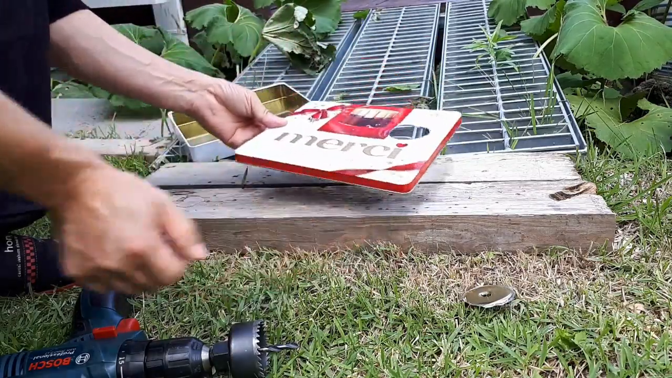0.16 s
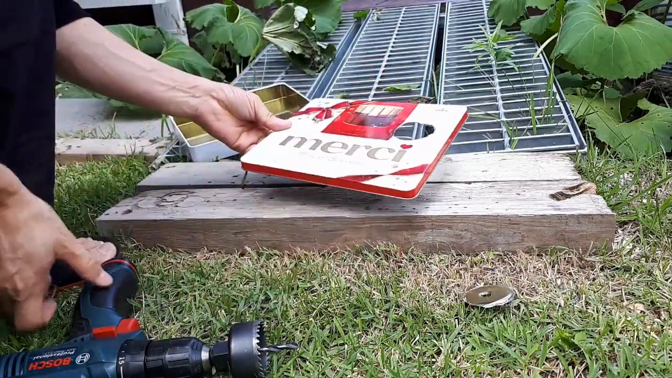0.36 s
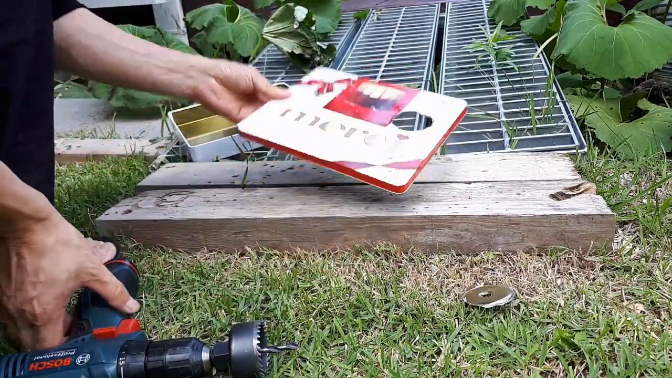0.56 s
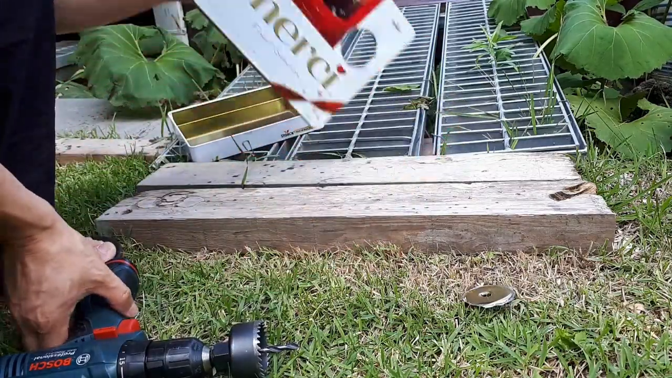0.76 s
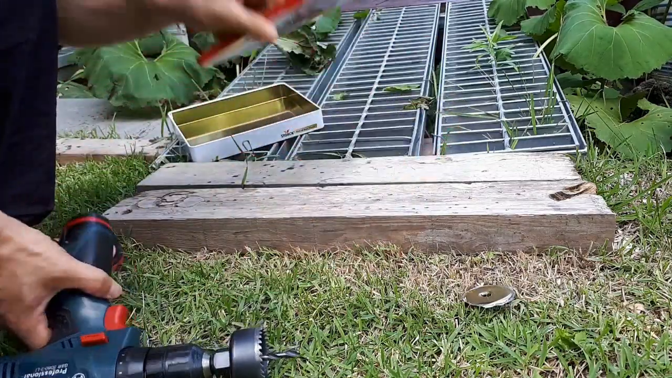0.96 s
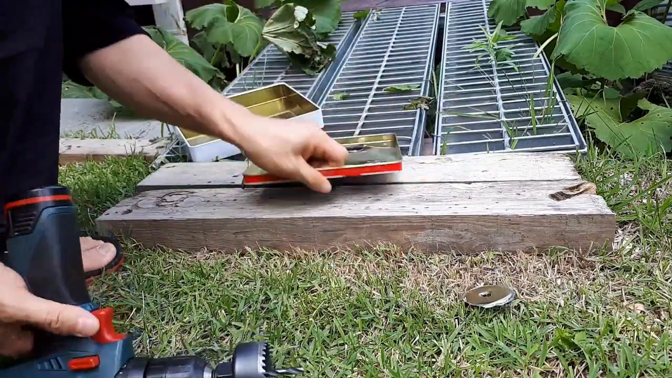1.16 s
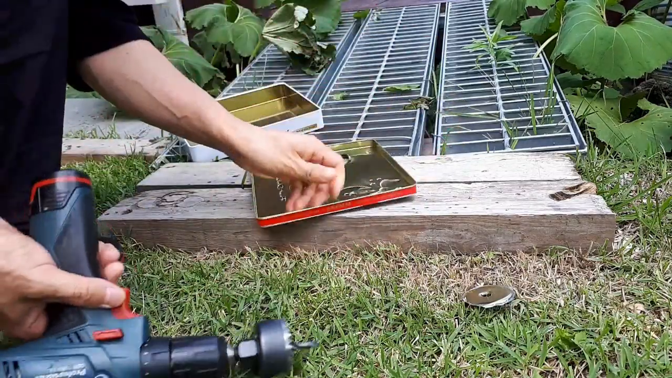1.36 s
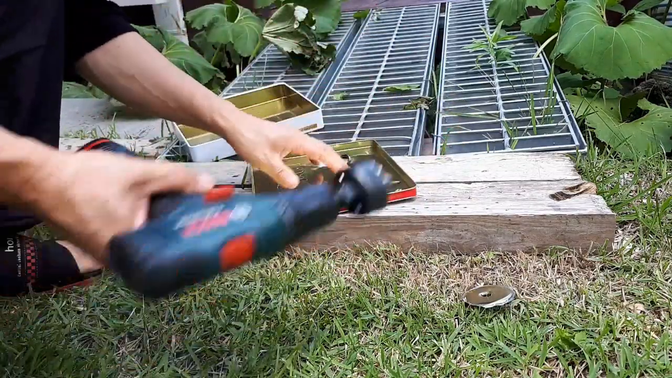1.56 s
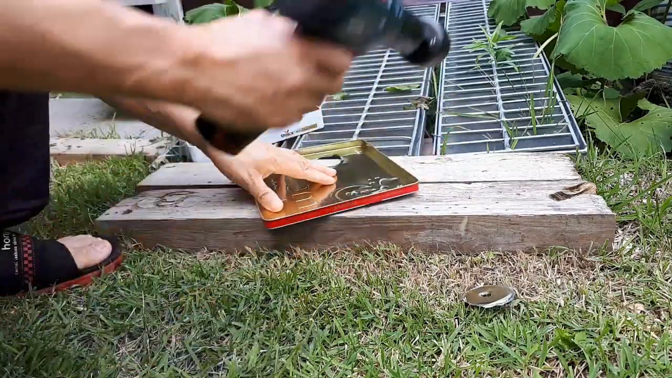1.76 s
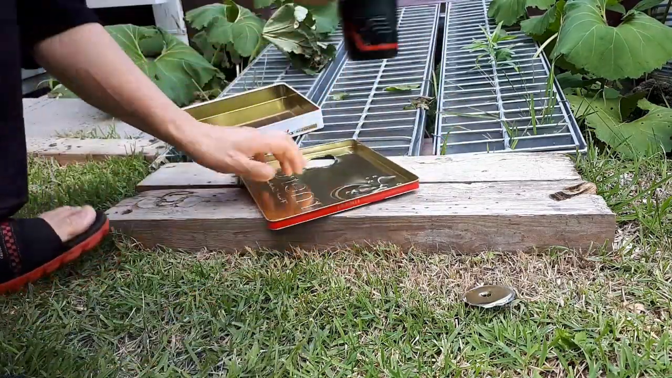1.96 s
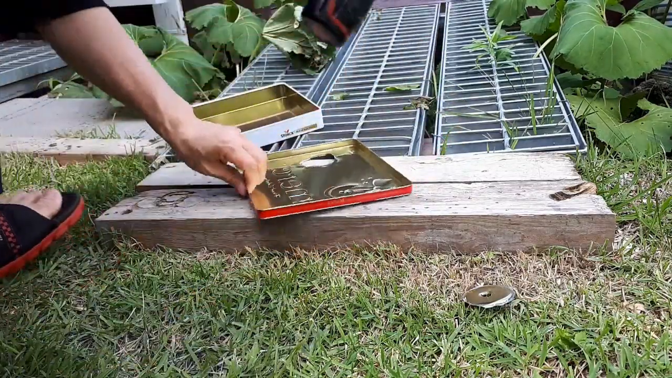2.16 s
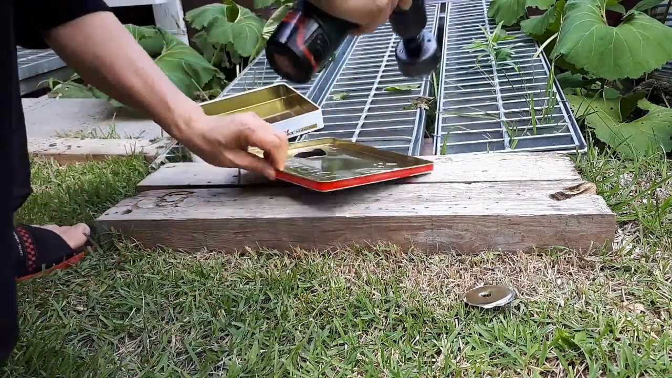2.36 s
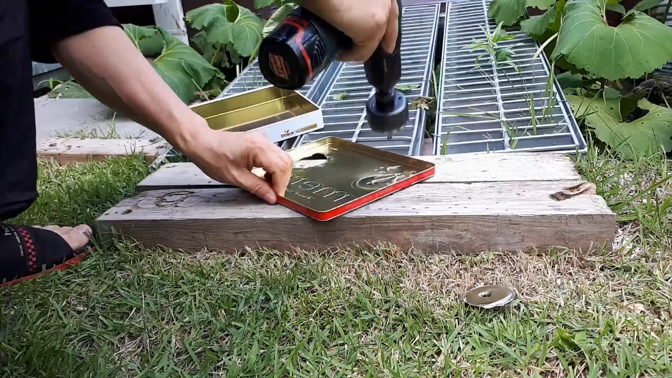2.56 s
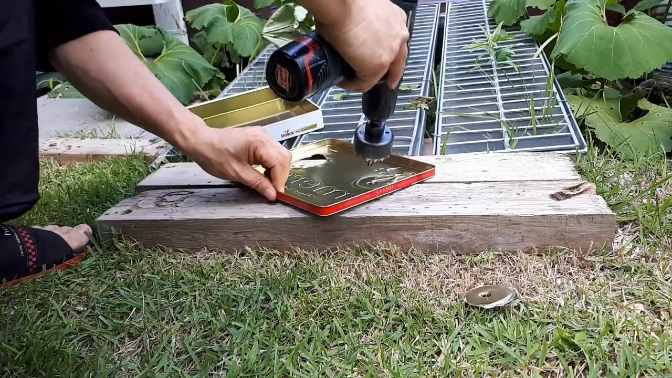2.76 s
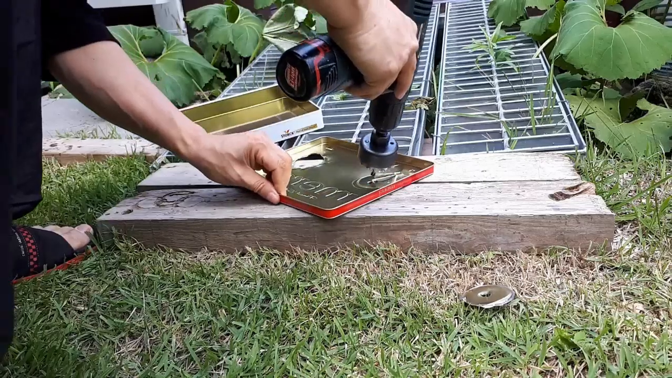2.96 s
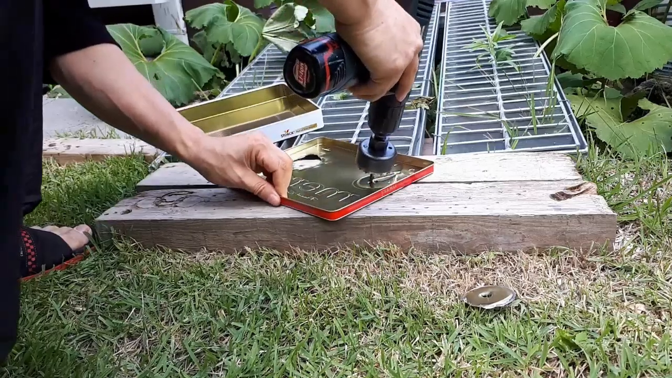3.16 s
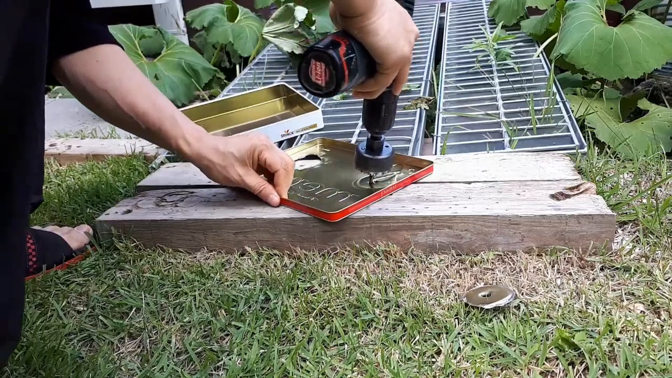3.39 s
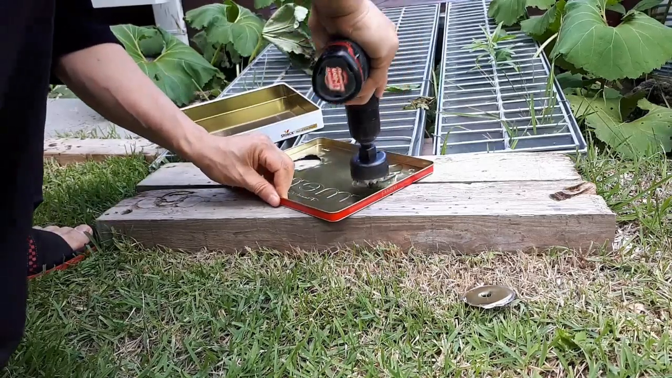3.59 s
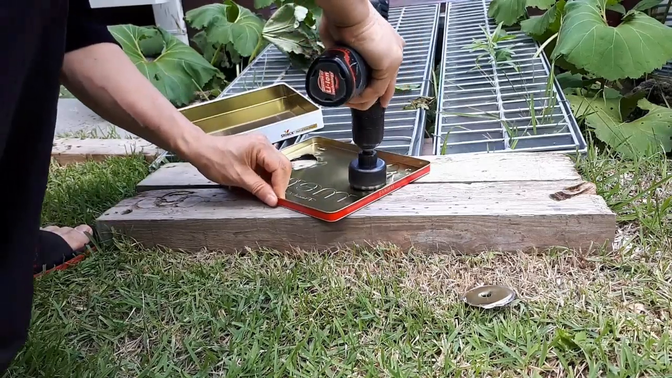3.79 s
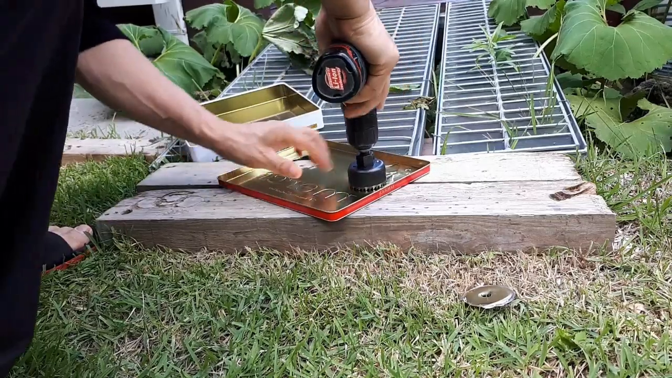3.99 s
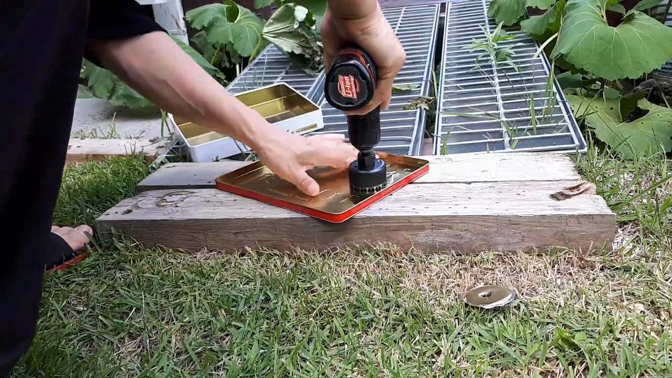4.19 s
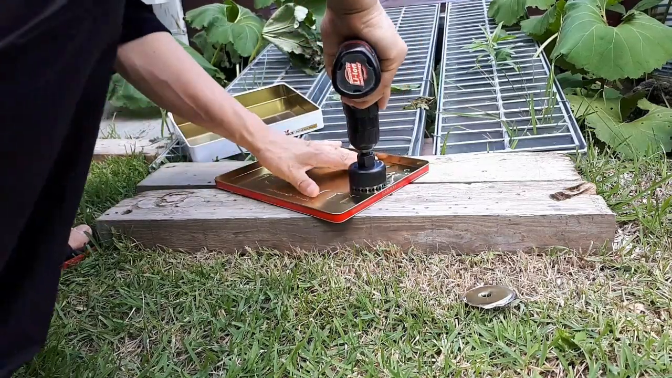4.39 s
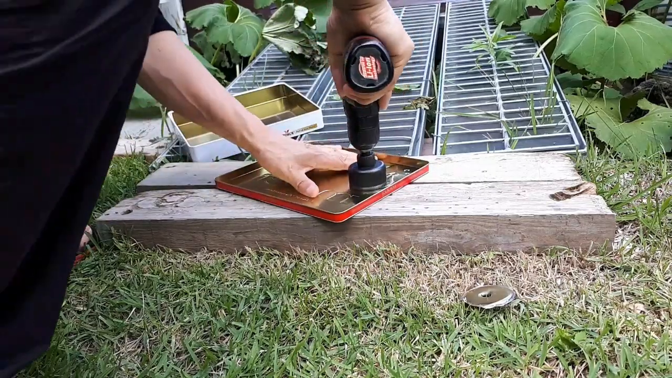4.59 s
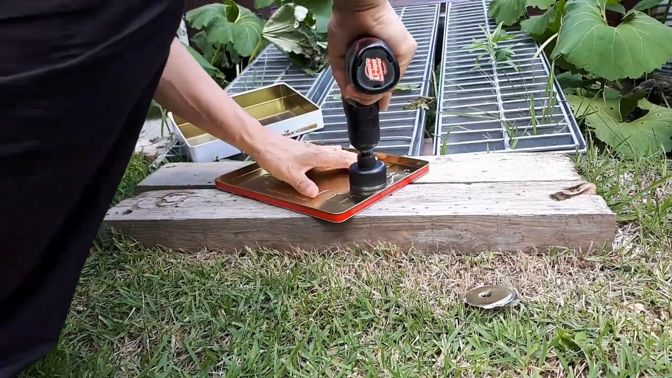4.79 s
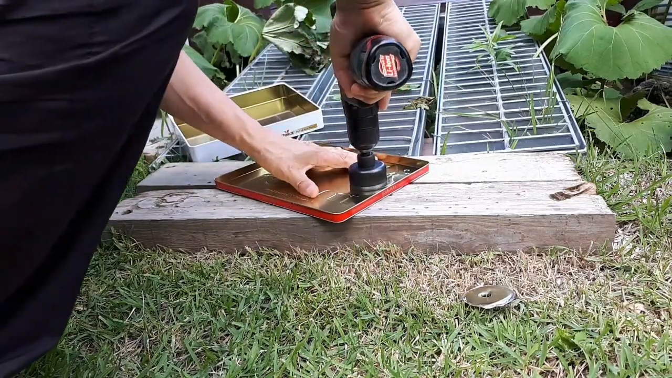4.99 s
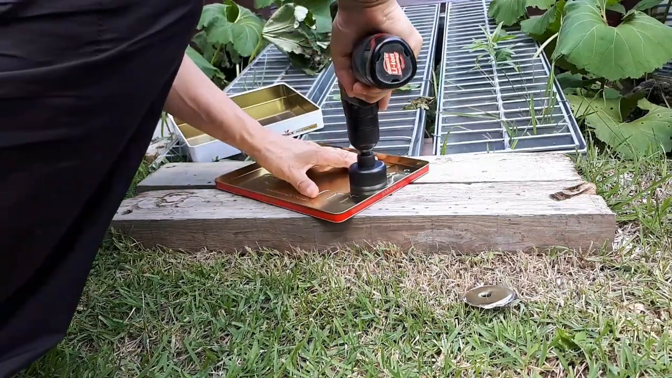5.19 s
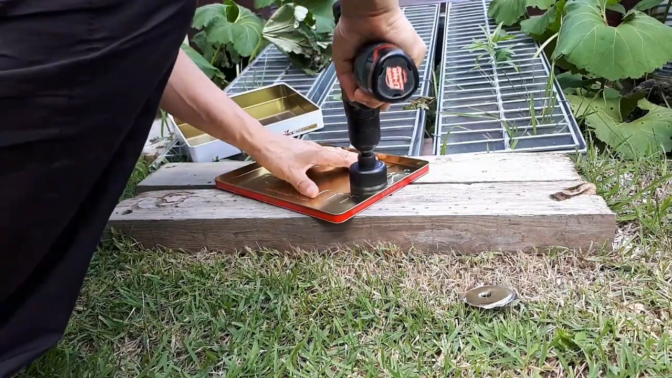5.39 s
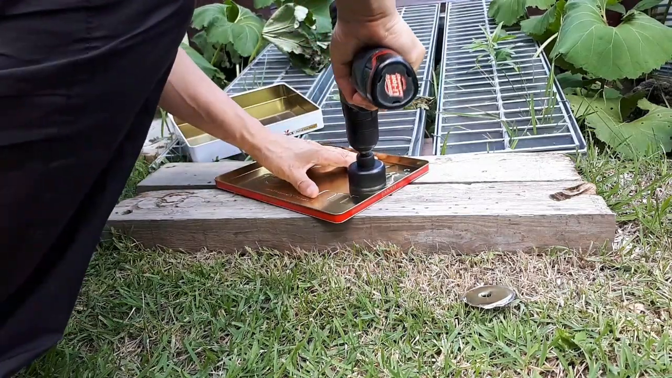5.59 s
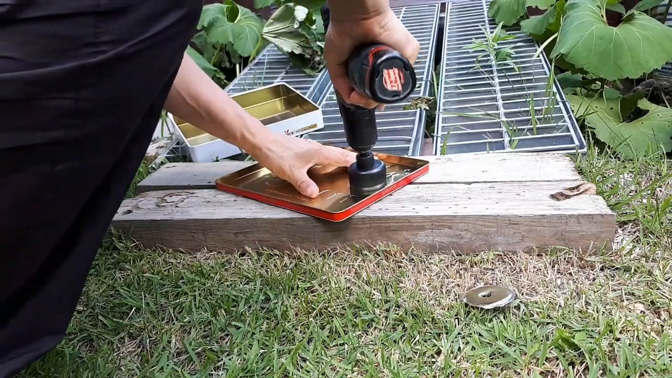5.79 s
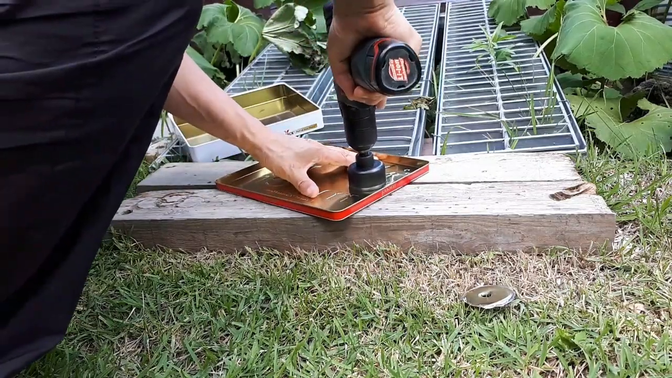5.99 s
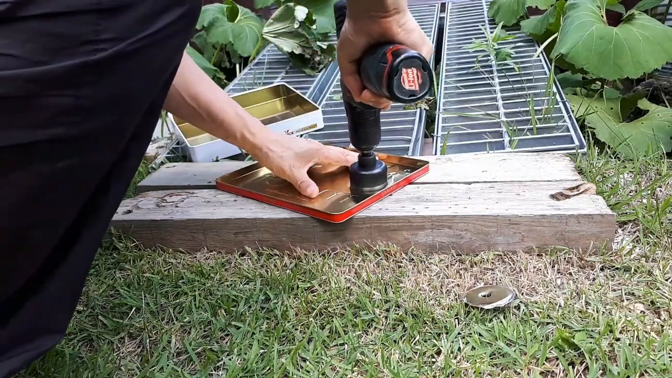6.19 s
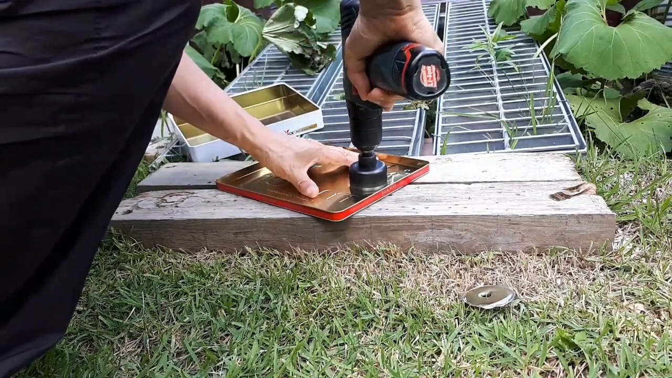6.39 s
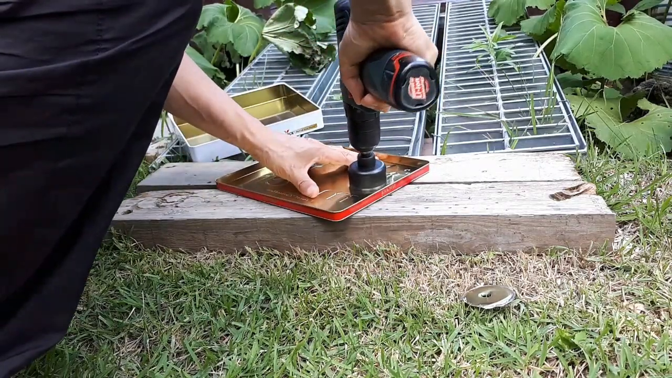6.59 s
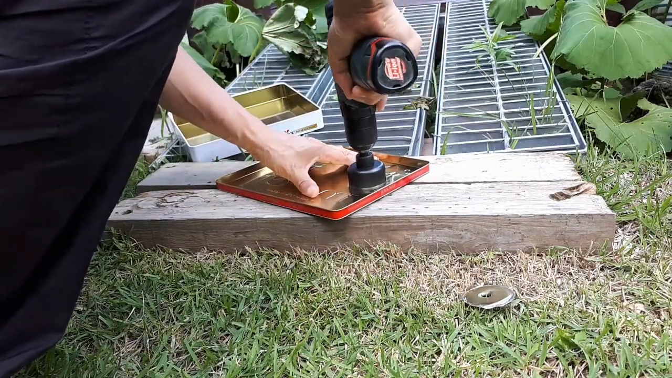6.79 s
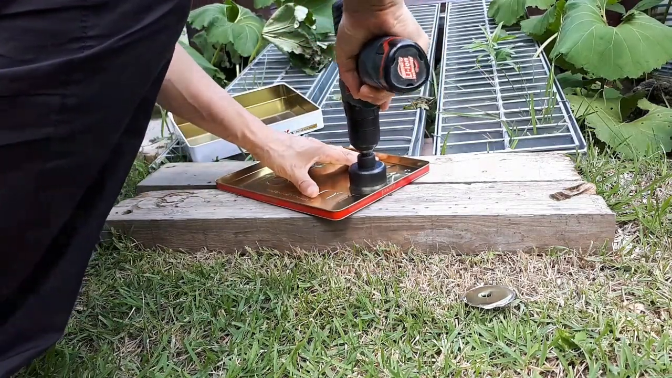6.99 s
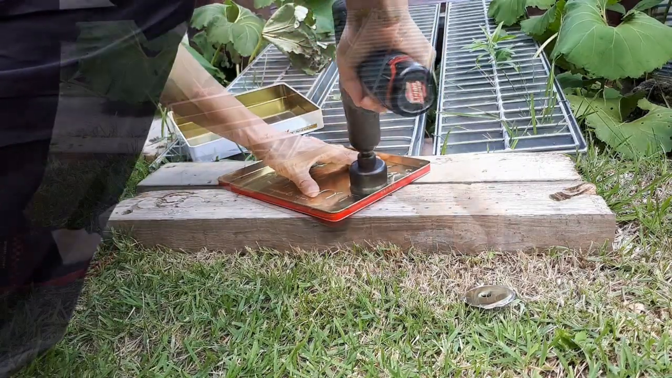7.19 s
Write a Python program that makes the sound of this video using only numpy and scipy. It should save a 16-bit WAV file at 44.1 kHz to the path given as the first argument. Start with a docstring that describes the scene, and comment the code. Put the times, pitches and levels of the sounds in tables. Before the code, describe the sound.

A quiet open-air garden, heard close and dry. During the first second there are only faint rubs, tiny tin taps and soft low puffs of wind. At about 1.2 s a thin tin lid lands on a wooden plank with a bright double clank, followed by hollow rattles until 1.5 s. It slides and ticks lightly until 3 s. Around 3.65 s a saw tip scratches harshly and knocks the sheet, with another scrape near 3.9 s and a faint sagging buckle at 4.0 s. At 4.55 s a drill spins up quickly and its hole saw makes a loud, buzzing metallic drone with raspy tearing and thin motor whine, easing until 5.5 s. From 5.9 s it grabs in rough, uneven bursts. Short piercing squeals dart out between 6.15 and 6.65 s, some with low thumps, as the saw labours and slows, then recovers. More squeaks come at 7.2 s as it slows again.

```python
"""Outdoors, a thin tin lid is picked up, dropped on a plank and slid into place: modes and noise bands.
A cordless drill's hole saw is set on it with a scratch: grainy noise through resonances.
It spins up: one blow per tooth through the sheet's resonances, tones on multiples of the tooth rate,
torn-chip noise, a motor whine in step. Short high squeals are gliding sines; with each one the
overloaded microphone adds a low thump."""
import sys
import numpy as np
from scipy import signal
from scipy.fft import rfft, irfft, next_fast_len
from scipy.io import wavfile
from scipy.ndimage import uniform_filter1d

SR = 44100
rng = np.random.default_rng(int(sys.argv[2]) if len(sys.argv) > 2 else 0)


def wav_record(signal):
    """Record a signal, one row per channel, as 16-bit PCM in the file named by sys.argv[1]."""
    frames = np.transpose(np.atleast_2d(signal))
    bounded = np.clip(frames, -1, 1)
    # unit amplitude maps onto the largest positive 16-bit level
    quanta = np.round(bounded * 32767).astype(np.int16)
    wavfile.write(sys.argv[1], SR, quanta)


N = 319725
TIME = np.arange(N) / SR


def from_db(db):
    """Decibels to gain."""
    return 10 ** (np.asarray(db) / 20)


def rms_one(x):
    """Scale to unit rms."""
    return x / np.sqrt(np.mean(x ** 2) + 1e-20)


def decay(t, t60_s):
    """Exponential decay by 60 dB in t60_s."""
    return np.exp(-np.log(1000) * t / t60_s)


def swell(middle_s, width_s):
    """Gaussian rise and fall, width_s between its 1/e points."""
    return np.exp(-(2 * (TIME - middle_s) / width_s) ** 2)


def drift(rate_hz):
    """Smooth random signal of rms 1 that changes at about this rate."""
    hz = np.arange(N // 2 + 1) * SR / N
    return rms_one(irfft(rfft(rng.standard_normal(N)) / (1 + (hz / rate_hz) ** 4), N))


def coloured(spectrum, grain_db=0):
    """Noise of a given spectrum, made of snaps of uneven size; rms 1."""
    size = next_fast_len(N)
    grain = from_db(grain_db * np.minimum(rng.exponential(1, size), 6))
    snaps = rng.standard_normal(size) * grain
    hz, db = np.transpose(spectrum)
    bins_hz = np.arange(size // 2 + 1) * SR / size
    gain = from_db(np.interp(np.log(bins_hz + 1), np.log(hz), db))
    return rms_one(irfft(rfft(snaps) * gain, size)[:N])


def dense_modes(spectrum, ripple_db, spacing_hz):
    """Thin sheet has countless modes: fine peaks and valleys ride on its broad spectrum."""
    broad_hz, broad_db = np.transpose(spectrum)
    hz = np.arange(broad_hz[0], SR / 2, spacing_hz)
    broad = np.interp(np.log(hz), np.log(broad_hz), broad_db)
    ripple = np.clip(rng.standard_normal(4000), -1.7, 1.7)[:len(hz)]
    # ripple shrinks below 2 kHz
    return np.column_stack([hz, broad + ripple_db * ripple * np.minimum(hz / 2000, 1)])


def resonate(x, resonances):
    """Parallel two-pole resonances with alternating signs."""
    out = 0
    for k, (hz, width_hz, db) in enumerate(resonances):
        r = np.exp(-np.pi * width_hz / SR)
        top = (-1) ** k * from_db(db) * (1 - r * r) / 2
        poles = [1, -2 * r * np.cos(2 * np.pi * hz / SR), r * r]
        out = out + signal.lfilter([top, 0, -top], poles, x + 1e-18)
    return out


def small_sheet(x, edge_hz=120):
    """A small sheet radiates little bass: second-order high-pass."""
    return signal.sosfilt(signal.butter(2, edge_hz, "high", fs=SR, output="sos"), x)


def evened(x):
    """Hold the running rms near 1."""
    power = np.abs(uniform_filter1d(x * x, size=3000))
    return x / np.sqrt(power + 1e-4 * np.mean(x * x))


def add(out, s, sound):
    """Mix a sound in at a time."""
    at = int(s * SR)
    out[at:at + len(sound)] += sound[:N - at]


# open-air and wind spectra: [f/Hz, relative level/dB per Hz]
AIR = [(15, -56.5), (25, -16.5), (129, -3.5), (198, -11.5), (331, -16.5), (389, -31), (495, -18),
       (582, -36), (970, -27.5), (1110, -28.5), (3090, -33.5), (12800, -30.5), (15500, -23.5)]
WIND = [(20, -26), (45, -2), (75, 6), (130, -10), (220, -36), (600, -60)]
# puffs of wind: [middle t/s, level/dB]
PUFFS = [(.243, -53.5), (.356, -58), (.41, -55), (.487, -44.5), (.53, -57), (.625, -54)]
AIR_DB, PUFF_S = -70, 0.042


def garden():
    """Quiet open air and puffs of wind: two coloured noises, the second gated by swells."""
    gust = sum(from_db(db) * swell(s, PUFF_S) for s, db in PUFFS)
    return from_db(AIR_DB) * coloured(AIR) + gust * coloured(WIND)


# low and upper modes of the loose lid: [f/Hz, relative level/dB, free t60/s]
LID_LOW = [(628, -2.5, 0.44), (724, -2, .25), (792, -6, .2), (858, 1.5, 0.28), (973, -6, 0.25),
           (1140, -11.5, .25)]
LID_UPPER = [(1360, -9, .25), (1555, -0.5, 0.2), (1730, -6, .3), (1880, -4, 0.36), (2000, -4.5, 0.22),
             (2090, -4, .3), (2286, -11, 0.6), (2390, -7, 0.26), (2595, -7, 0.17), (2940, -11.5, 0.48),
             (3360, -13, .25), (3550, -11, .25)]
# rub and bright friction spectra: [f/Hz, relative level/dB per Hz]
RUB = [(100, -12.5), (400, 0.5), (750, -3), (1200, -0.5), (2200, -3.5), (3500, -14), (8000, -32.5)]
HISS = [(1500, -3.5), (3500, 1.5), (6000, -3.5), (7900, 1.5), (9500, -8), (16000, -7)]
# the lid slides under the hand: [middle t/s, 1/e width/s, rub/dB, hiss/dB], before the shares and trim below
STROKES = [(.14, 0.15, -68, -62), (0.234, 0.22, -63.5, -62.5), (.58, 0.73, -80, -79),
           (0.827, 0.13, -68, -71.5), (1.057, 0.2, -72, -64.5), (1.428, 0.11, -30, -58),
           (1.59, 0.3, -67, -67), (1.837, 0.081, -45.5, -51.5), (1.97, 0.29, -57.5, -59),
           (2.26, 0.34, -55.5, -66), (2.438, 0.17, -48, -65.5), (2.892, 0.05, -68.5, -69.5),
           (3.238, 0.19, -68.5, -71.5), (3.845, 0.35, -47.5, -59.5), (3.991, 0.091, -62, -68),
           (4.133, 0.071, -58, -67), (4.28, 0.048, -61, -63), (4.373, 0.19, -69, -73),
           (4.496, 0.095, -59, -71)]


def sliding(dry_share=0.59, ring_share=0.51, hiss_trim_db=-1.5):
    """Tin rubs on skin and wood, and rings faintly; each stroke swells and fades."""
    rub_power, hiss_power = np.zeros((2, N))
    for s, width_s, rub_db, hiss_db in STROKES:
        stroke = swell(s, width_s)
        rub_power += (from_db(rub_db) * stroke) ** 2
        hiss_power += (from_db(hiss_db) * stroke) ** 2
    friction = coloured(RUB, grain_db=5.0)
    # a free mode is 2.2 / t60 wide; these are wider
    modes = [(hz, 2.9 / t60, db) for hz, db, t60 in LID_LOW + LID_UPPER]
    ringing = rms_one(resonate(friction, modes))
    bright = coloured(dense_modes(HISS, ripple_db=2.0, spacing_hz=47.2), grain_db=3.0)
    rub = np.sqrt(rub_power) * (dry_share * friction + ring_share * ringing)
    return rub + np.sqrt(hiss_power) * from_db(hiss_trim_db) * bright


# ring spectra: [f/Hz, relative level/dB per Hz]
RING_LOW = [(50, -45.5), (160, -2.5), (400, -7), (620, 0), (850, 2), (1100, -3.5), (1700, -12.5),
            (4000, -48.5)]
RING_MID = [(600, -27.5), (1400, -1.5), (2200, -3.5), (3100, -7), (4300, -20), (9000, -37.5)]
RING_HIGH = [(1500, -26.5), (3500, -1.5), (6000, -4.5), (7900, -0.5), (9300, -10.5), (16000, -16)]
# the lid knocks on wood, hand and tool, light contacts and bounces alike:
# [t/s, low ring/dB, mid ring/dB, treble/dB, low and mid t60/s], levels before the trims below
KNOCKS = [(0.166, -57, -55, -71, 0.13), (0.21, -54, -49, -66, 0.056), (1.166, -71, -56, -48, 0.047),
          (1.201, -41, -25.5, -21, 0.16), (1.208, -28.5, -19.5, -18, 0.26), (1.299, -31.5, -25, -44, 0.2),
          (1.32, -47, -29.5, -34, 0.2), (1.375, -30, -29.5, -41.5, 0.27), (1.395, -30, -31, -42, 0.11),
          (1.422, -34, -35, -43.5, 0.52), (1.485, -34, -37, -47.5, 0.41), (1.699, -36.5, -43.5, -48, 0.16),
          (1.93, -55, -43.5, -37.5, 0.073), (2.022, -63, -49, -70, 0.09), (2.124, -41, -46.5, -45, 0.42),
          (2.157, -38.5, -40.5, -63, 0.18), (2.236, -43, -36.5, -36, 0.3), (2.37, -51.5, -49, -74, 0.28),
          (2.42, -51.5, -44, -54.5, 0.56), (2.551, -54, -56.5, -60.5, 0.42), (2.985, -64, -81.5, -79, 0.21),
          (3.174, -67, -69.5, -59.5, 0.24), (3.274, -64, -57, -57, 0.17), (3.385, -64, -58, -63, 0.093),
          (3.412, -67, -53.5, -73, 0.071), (3.588, -58, -54, -61, 0.18), (3.703, -30, -28, -54, 0.098),
          (3.783, -49.5, -54, -50, 0.11), (4.001, -63.5, -48, -46.5, 0.19), (4.026, -39.5, -75, -64, 0.39),
          (4.07, -62, -79, -82, 0.16), (4.275, -54, -82, -81, 0.18), (4.448, -43.5, -42, -56, 0.053),
          (4.522, -49, -39.5, -46, 0.08)]


def knocks(low_trim_db=-1.5, mid_trim_db=-4, high_trim_db=-2.0,
           low_modes_trim_db=-4, upper_modes_trim_db=-5, high_life=0.53):
    """Each knock rings the lid's main modes and its dense upper ones; the hand damps them by varying amounts."""
    out, t = np.zeros(N), np.arange(int(.6 * SR)) / SR
    low_power, mid_power, high_power = np.zeros((3, N))
    for s, low_db, mid_db, high_db, t60 in KNOCKS:
        fade = decay(t, t60)
        add(low_power, s, (from_db(low_db + low_trim_db) * fade) ** 2)
        add(mid_power, s, (from_db(mid_db + mid_trim_db) * fade) ** 2)
        add(high_power, s, (from_db(high_db + high_trim_db) * fade ** (1 / high_life)) ** 2)
        freedom = np.clip(t60 / 0.45, .05, 1)
        mode_groups = (LID_LOW, low_db + low_modes_trim_db), (LID_UPPER, mid_db + upper_modes_trim_db)
        for modes, level_db in mode_groups:
            for hz, db, free_t60 in modes:
                ring = decay(t, free_t60 * freedom) * np.sin(2 * np.pi * hz * t)
                gain = from_db(level_db + db + rng.normal(0, 0.68))
                add(out, s, rng.choice([-1, 1]) * gain * ring)
    for power, spectrum in (low_power, RING_LOW), (mid_power, RING_MID), (high_power, RING_HIGH):
        out += np.sqrt(power) * coloured(dense_modes(spectrum, ripple_db=5.0, spacing_hz=35.0))
    return out


# resonances under the saw's tip: [f/Hz, width/Hz, relative level/dB]
TIP = [(230, 370, -12), (996, 730, -2.5), (1660, 180, 5.5), (1830, 69, 6), (2350, 870, -1),
       (4550, 700, -5.5), (7450, 1300, -6.5)]
# the tip skids over the tin, builds up and breaks off:
# [peak t/s, rise/s, skid/dB, ring of the sheet/dB], levels before the trims below
SKIDS = [(3.285, 0.023, -63.5, -54.5), (3.39, 0.013, -60, -62), (3.598, 0.015, -55.5, -46),
         (3.657, 0.02, -32, -38.5), (3.704, 0.028, -32, -34.5), (3.923, 0.046, -37.5, -53)]
SKID_RELEASE_S = .013


def scratch(body_trim_db=-3, hiss_trim_db=-7, ring_trim_db=-1, ring_hz=850, ring_width_hz=25):
    """The saw's tip skids in tiny slips over the sheet, whose main mode sings."""
    level, ring = np.zeros((2, N))
    for s, rise_s, skid_db, ring_db in SKIDS:
        shape = np.exp(-np.maximum((s - TIME) / rise_s, (TIME - s) / SKID_RELEASE_S))
        level += from_db(skid_db) * shape
        ring += from_db(ring_db) * shape
    slip_spectrum = [(100, 8.0), (800, 0.0), (16000, -4.5)]  # f/Hz, relative level/dB per Hz
    slips = coloured(dense_modes(slip_spectrum, ripple_db=7.5, spacing_hz=40.6), grain_db=5.0)
    bright = coloured(dense_modes(HISS, ripple_db=0.5, spacing_hz=47.4), grain_db=4.0)
    body = from_db(body_trim_db) * rms_one(resonate(slips, TIP))
    skid = level * from_db(2.2 * drift(55)) * (body + from_db(hiss_trim_db) * bright)
    singing = rms_one(resonate(slips, [(ring_hz, ring_width_hz, 0)]))
    return skid + ring * from_db(ring_trim_db) * singing


# the lid buckles under the palm: [t/s, level/dB] before the relative level of each low mode
BUCKLE = (4.026, -47.5)


def buckle(start=1.2, end=0.18, slacken_s=0.041, t60_s=0.39):
    """As the sheet gives way its low modes slide down in pitch, from start to end times their own."""
    out, t = np.zeros(N), np.arange(int(.4 * SR)) / SR
    s, level_db = BUCKLE
    stretch = np.cumsum(end + (start - end) * np.exp(-t / slacken_s)) / SR
    envelope = np.minimum(t / .002, 1) * decay(t, t60_s)
    for hz, db, _ in LID_LOW:
        tone = np.sin(2 * np.pi * (hz * stretch + rng.random()))
        add(out, s, from_db(level_db + db) * envelope * tone)
    return out


# the teeth dig into the sheet: [t/s, length before release/s, sheet chatter/dB, chip hiss/dB,
# share of clear tone/0-1], levels at onset, before the trims, feed and pressure in saw()
DIGS = [(4.586, .885, -18.5, -30.5, 0.86), (5.493, 0.016, -21, -30, 0.78), (5.55, 0.014, -25.5, -37.5, 1),
        (5.884, 0.05, -22, -32.5, 0.42), (5.971, 0.023, -22.5, -44, .5), (6.008, .032, -22, -39.5, 0.9),
        (6.065, 0.035, -24.5, -39, 0.5), (6.108, 0.077, -26.5, -34, 0.35), (6.175, 0.034, -24, -33.5, .3),
        (6.219, 0.029, -26, -34, 0.5), (6.352, 0.039, -38, -35.5, 0), (6.403, 0.058, -34.5, -32.5, 0.03),
        (6.453, 0.11, -29, -30.5, 0.75), (6.59, 0.017, -32, -39, 0.6), (6.727, 0.051, -26, -31, 0.19),
        (6.796, 0.041, -22.5, -34.5, 0.88), (6.848, 0.034, -24.5, -38, 0.64),
        (6.897, 0.21, -22.5, -37, 0.61), (7.039, .05, -28.5, -31.5, 0.45), (7.095, .07, -32, -34, 0.64),
        (7.217, 0.017, -44, -37, 0)]
DIG_ATTACK_S, DIG_RELEASE_S, DIG_EASE_DB_PER_S = 0.01, .012, 5.5
# between digs the saw skates in its groove
SKATE_CHATTER_DB, SKATE_CHIPS_DB, SKATE_RASP_DB, SKATE_TONE = -32, -44.5, -27.5, 0.52


def digging():
    """Each dig sets in fast, eases off and lets go; gives chatter dB, chip hiss dB and share of clear tone."""
    chatter, chips = from_db(SKATE_CHATTER_DB) ** 2, from_db(SKATE_CHIPS_DB) ** 2
    tone = SKATE_TONE * chatter
    for s, length_s, chatter_db, chips_db, share in DIGS:
        t = np.maximum(TIME - s, 0)
        release = np.exp(-np.maximum(t - length_s, 0) / DIG_RELEASE_S)
        depth = np.minimum(t / DIG_ATTACK_S, 1) * from_db(-DIG_EASE_DB_PER_S * t) * release
        power = (from_db(chatter_db) * depth) ** 2
        chatter = chatter + power
        tone = tone + share * power
        chips = chips + (from_db(chips_db) * depth) ** 2
    return 10 * np.log10(chatter), 10 * np.log10(chips), np.clip(tone / chatter, 0, .95)


TEETH = 16


def tooth_blows(passed, scatter_ms, uneven_db=1.5, chance_db=3.5, set_ms=0.066):
    """One blow per tooth; each tooth has its own height and set, repeated on every turn."""
    tooth = np.arange(1, int(passed[-1]))
    s = np.interp(tooth, passed, TIME)
    height, offset = rng.standard_normal((2, TEETH))[:, tooth % TEETH]
    force, slip = rng.standard_normal((len(tooth), 2)).T
    s = s + (set_ms * offset + np.interp(s, TIME, scatter_ms) * slip) / 10 ** 3
    at = np.clip(np.round(s * SR).astype(int), 0, N - 1)
    return np.bincount(at, from_db(uneven_db * height + chance_db * force), N)


# tones of the sheet driven by the teeth: [multiple of the tooth rate, relative level/dB at full speed]
TOOTH_TONES = [(1, -24), (2, -8), (3, -4), (4, -6), (5, 1), (6, -30), (8, -8.5), (14, -8.5), (15, -17)]


def tooth_tones(passed, speed, waver_db=4.0, smear=0.49, swing=0.57, slow_loss_db=6, slow_smear=0.52):
    """While the teeth strike evenly the sheet sings on multiples of their rate, each wavering on its own."""
    turn, out = 2 * np.pi * passed / TEETH, 0
    slowness = 1 - speed / speed.max()
    for order, db in TOOTH_TONES:
        # slow teeth strike softly and unevenly: the upper tones fade and break up
        level_db = db - slow_loss_db * slowness * (order - 2) + waver_db * drift(34)
        skid = smear * drift(33) + slow_smear * slowness * np.log(order) * drift(110)
        phase = order * 2 * np.pi * passed + skid + swing * np.sin(turn + order)
        out = out + from_db(level_db) * np.sin(phase)
    return out


# saw speed before flutter, sagging under load: [t/s, tooth rate/Hz]
SPEED = [(4.54, 60), (4.63, 155), (4.72, 286), (4.81, 318), (5.04, 308), (5.18, 318), (5.32, 317),
         (5.45, 309), (5.81, 274), (6.0, 295), (6.14, 278), (6.54, 271), (6.615, 259), (6.635, 222),
         (6.72, 213), (6.8, 257), (6.93, 292), (7.07, 298), (7.18, 214), (7.25, 183)]
# resonances of the lid pressed down by the saw: [f/Hz, width/Hz, relative level/dB]
PRESSED = [(182, 27, -20.5), (303, 200, -10), (529, 51, 1), (827.5, 72, 6.5), (1265, 49, 1.5),
           (1604, 116, 5.5), (1793, 130, 3), (2660, 68, -4), (3180, 820, -5)]
# tearing and chip spectra: [f/Hz, relative level/dB per Hz]
RASP = [(40, -54), (160, -7), (300, -2.5), (430, -14.5), (600, 1.5), (1050, -3.5), (1900, 2.5),
        (3200, -1.5), (3900, -2), (4500, -1), (6700, -6.5), (8200, -4.5), (9300, -14), (16000, -15)]
CHIPS = [(3000, -34), (6000, 1.5), (8300, 11.5), (9300, 1), (13000, 1.5), (16000, -3)]
RASP_PER_CHATTER, RASP_PER_CHIPS = 0.22, 0.25  # dB of rasp gained per dB of each
ROUGH_SCATTER_MS = 0.59  # scatter of the tooth blows when no clear tone is left
# the saw is fed in: it starts quieter by FEED_DB (chips by CHIPS_FEED_DB), closing the gap exponentially
START_S, FEED_S, FEED_DB, CHIPS_FEED_DB = 4.53, 0.051, 26.5, 63
RASP_FEED_DB = 4  # extra gap: tearing sets in later than the chatter
WHINE_PER_TOOTH = 32 / 3  # motor cycles per tooth
WHINE_DB, WHINE_STALL_DB = -35, 21  # at full speed and skating; what it would gain at a standstill
WHINE_RECEDES = 0.18  # dB of whine lost per dB of sheet chatter


def saw(tones_trim_db=-1.5, chips_trim_db=5.5, wobble_db=0.5, grab_db=1.5, flutter=0.00657, tooth_gate_db=0.5):
    """Teeth strike the sheet and tear chips from it; the motor whines in step, louder as it labours."""
    speed = np.interp(TIME, *np.transpose(SPEED))
    chatter_db, chips_db, share = digging()
    chatter_gain_db = chatter_db - SKATE_CHATTER_DB
    rasp_db = SKATE_RASP_DB + RASP_PER_CHATTER * chatter_gain_db + RASP_PER_CHIPS * (chips_db - SKATE_CHIPS_DB)
    sag = 1 - speed / np.maximum.accumulate(speed)
    whine_db = WHINE_DB + WHINE_STALL_DB * sag - WHINE_RECEDES * chatter_gain_db
    gap = np.exp(-np.maximum(TIME - START_S, 0) / FEED_S)
    passed = np.cumsum(speed * (1 + flutter * drift(34.2))) / SR  # teeth so far

    # the saw sits slightly askew, so it presses harder once a turn, and it grabs at random
    wobble = wobble_db * np.sin(2 * np.pi * passed / TEETH)
    pressure = from_db(wobble + grab_db * (1.5 - share) * drift(37))
    blows = tooth_blows(passed, ROUGH_SCATTER_MS * (1 - share))
    struck = evened(small_sheet(resonate(blows, PRESSED)))
    sheet = struck * from_db(chatter_db) * np.sqrt(1 - share ** 2)
    tones = tooth_tones(passed, speed) * share * from_db(chatter_db + tones_trim_db)

    # tearing comes in spurts, one for each tooth
    spurts = rms_one(from_db(tooth_gate_db * np.cos(2 * np.pi * passed) + 1.21 * drift(44)))
    tearing = coloured(dense_modes(RASP, ripple_db=2.5, spacing_hz=29.82), grain_db=2.5)
    tearing = tearing * from_db(rasp_db - RASP_FEED_DB * gap)
    hiss = coloured(dense_modes(CHIPS, ripple_db=4.0, spacing_hz=40.3))
    hiss = hiss * from_db(chips_db + chips_trim_db - CHIPS_FEED_DB * gap)

    motor_phase = 2 * np.pi * passed * WHINE_PER_TOOTH + 0.59 * drift(86.0)
    motor = from_db(whine_db + 2.9 * drift(53.0)) * np.sin(motor_phase)
    fed = from_db(-FEED_DB * gap) * (pressure * (sheet + tones) + spurts * tearing + motor)
    return (fed + spurts * hiss) * (TIME >= START_S)


# steel sticks and slips on the cut edge:
# [t/s, level/dB, f/Hz before glide, low thump/dB before trim]
SQUEALS = [(6.1609, -20.5, 7790, -48), (6.217, -10, 7750, -29.5), (6.4125, -15, 7905, -35),
           (6.4237, -11.5, 8350, -29), (6.4824, -16.5, 7830, -39), (6.545, -18, 7650, -49),
           (6.576, -19.5, 8240, -55), (6.635, -12, 8540, -20), (7.1835, -14, 8500, -33.5),
           (7.225, -17.5, 8670, -41)]


def squeals(rise_s=0.00313, tail_s=0.011, tail=0.75, glide=0.022, thump_trim_db=14, thump_hz=125, thump_s=0.0028):
    """A steel mode swells within about 3 ms, sags in pitch and dies; the overloaded microphone adds a low thump."""
    out, t = np.zeros(N), np.arange(int(.08 * SR)) / SR
    burst = np.exp(-((t - rise_s) / (0.32 * rise_s)) ** 2)
    envelope = burst + tail * np.minimum(t / rise_s, 1) * np.exp(-t / tail_s)
    pitch = 1 + glide * (np.exp(-t / tail_s) - .5)
    thump = np.minimum(t / 0.00079, 1) * np.exp(-t / thump_s) * np.cos(2 * np.pi * thump_hz * t)
    for s, db, hz, thump_db in SQUEALS:
        turns = np.cumsum(hz * pitch) / SR
        add(out, s, from_db(db) * envelope * np.sin(2 * np.pi * turns))
        add(out, s + rise_s, -from_db(thump_db + thump_trim_db) * thump)
    return out


def scene():
    """Everything is close and dry, and the same in both ears."""
    lid = small_sheet(sliding() + knocks() + scratch() + buckle(), edge_hz=57)
    return np.tile(garden() + lid + saw() + squeals(), (2, 1))


CUTOFF_HZ = 15900


def record(dry):
    """The top is cut steeply by an elliptic low-pass."""
    return signal.sosfilt(signal.ellip(12, .2, 80, CUTOFF_HZ, fs=SR, output="sos"), dry)


dry = scene()
out = record(dry)
wav_record(out)
```